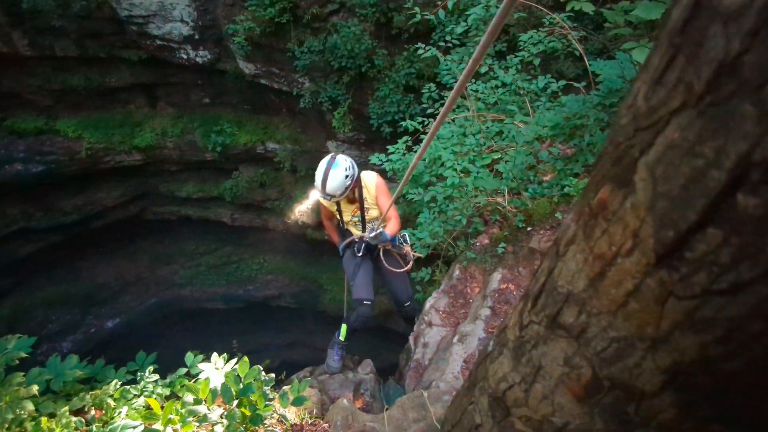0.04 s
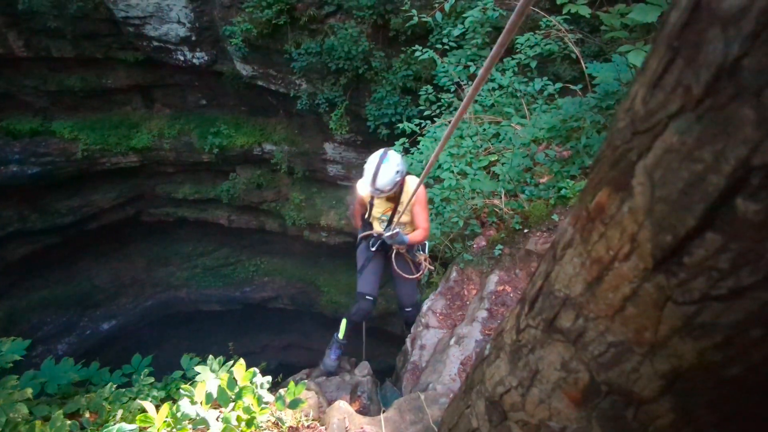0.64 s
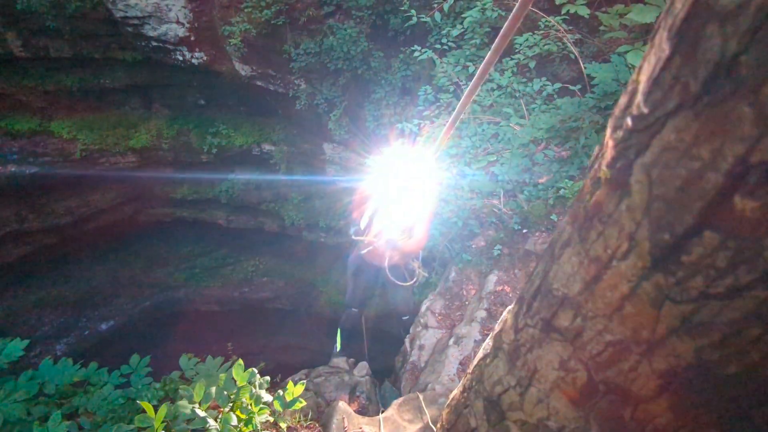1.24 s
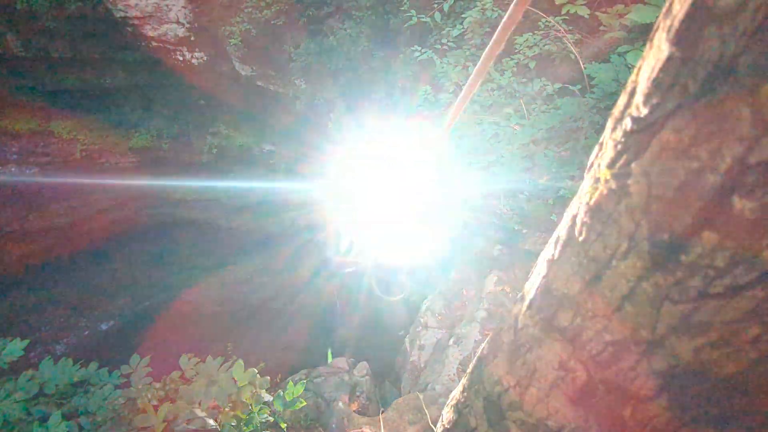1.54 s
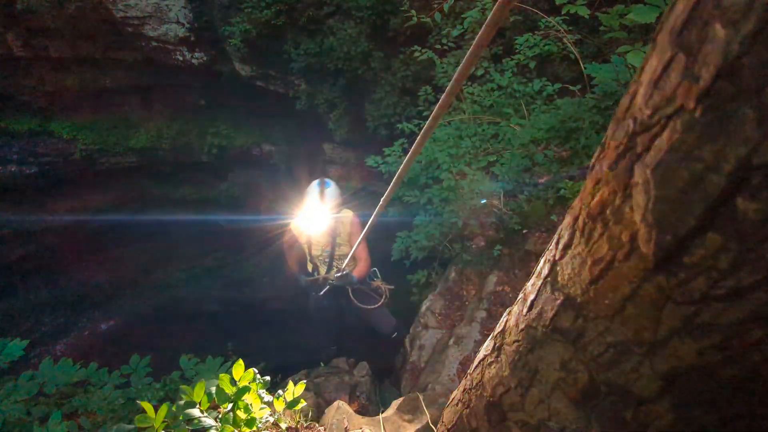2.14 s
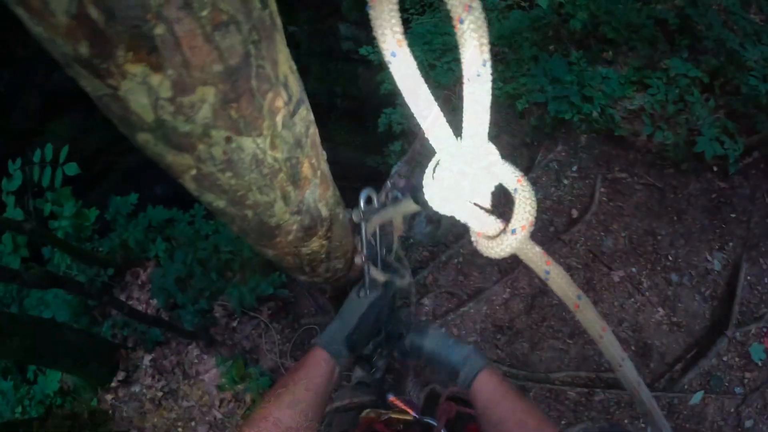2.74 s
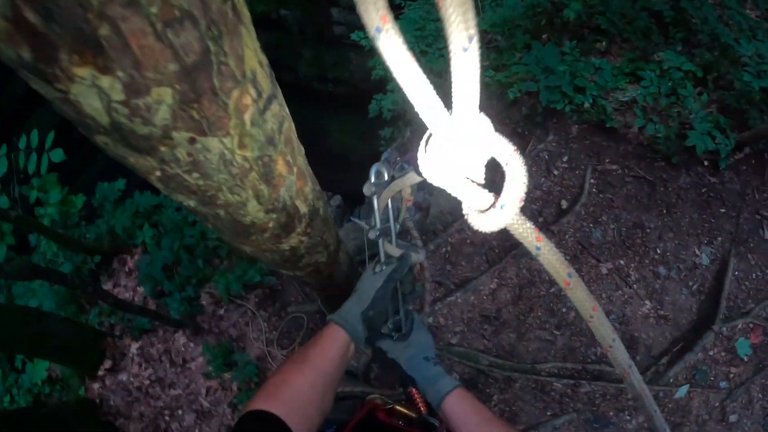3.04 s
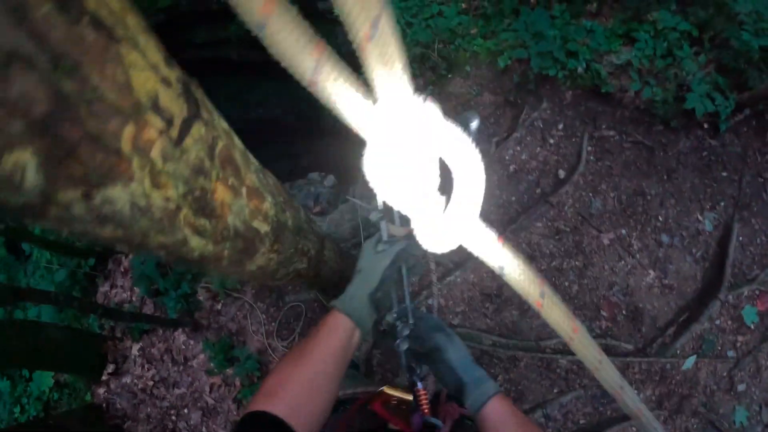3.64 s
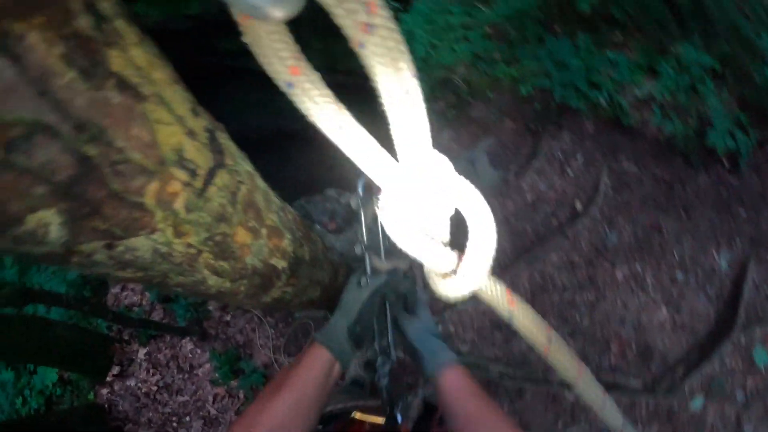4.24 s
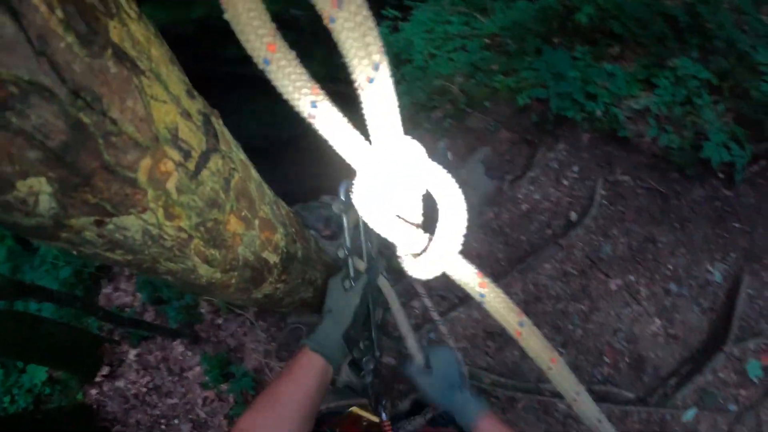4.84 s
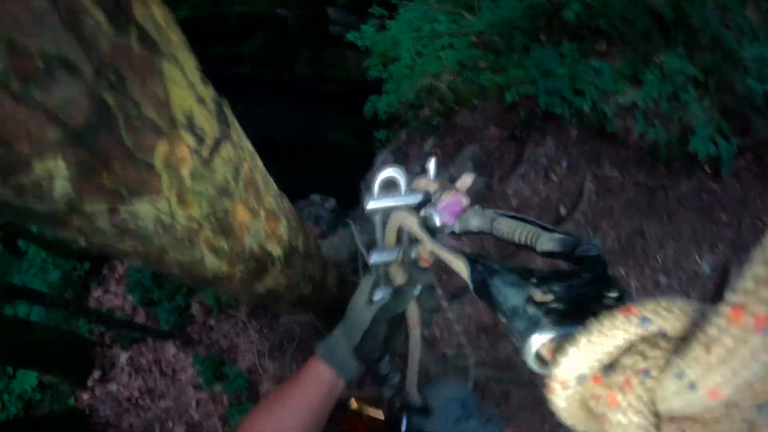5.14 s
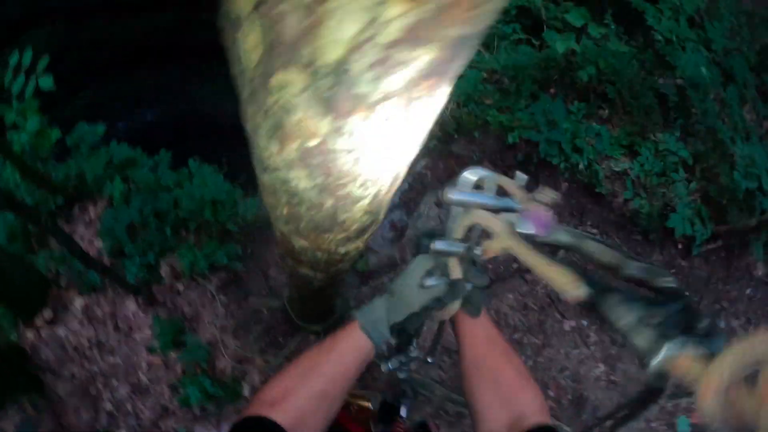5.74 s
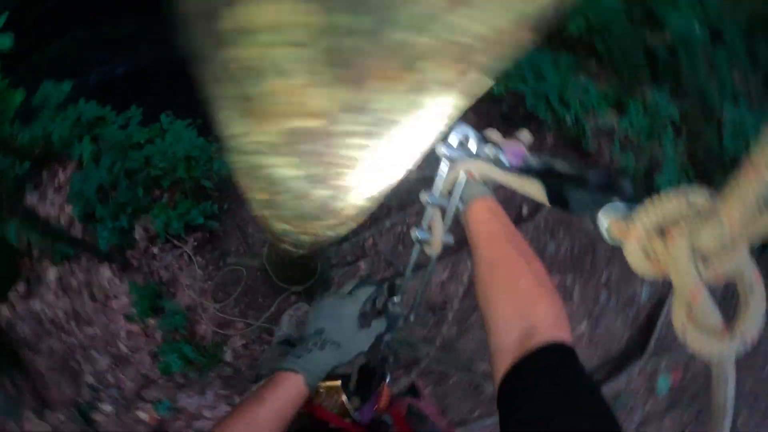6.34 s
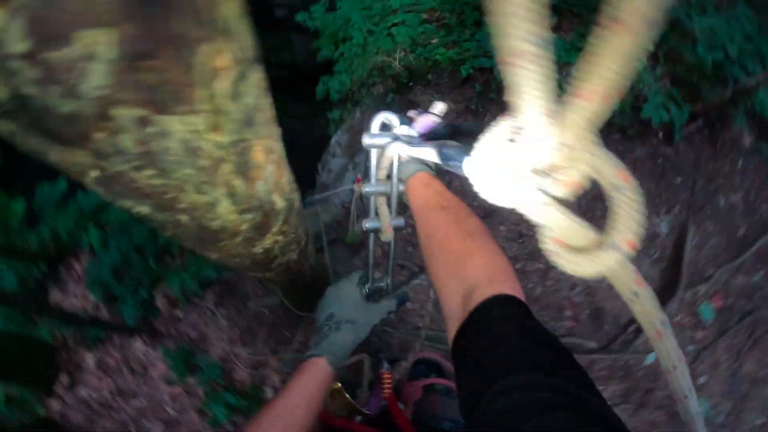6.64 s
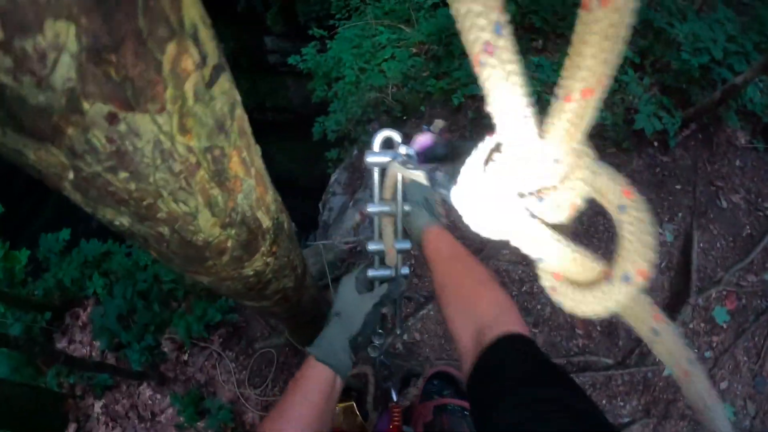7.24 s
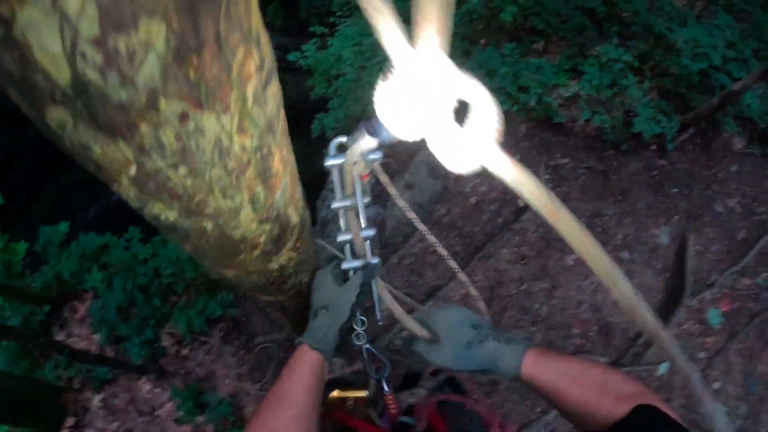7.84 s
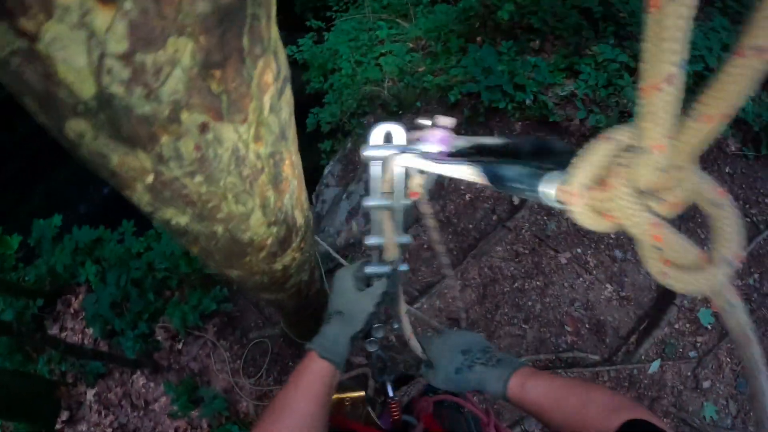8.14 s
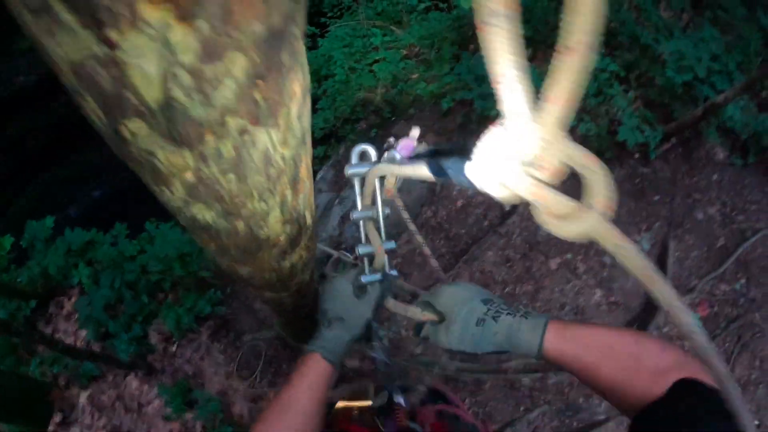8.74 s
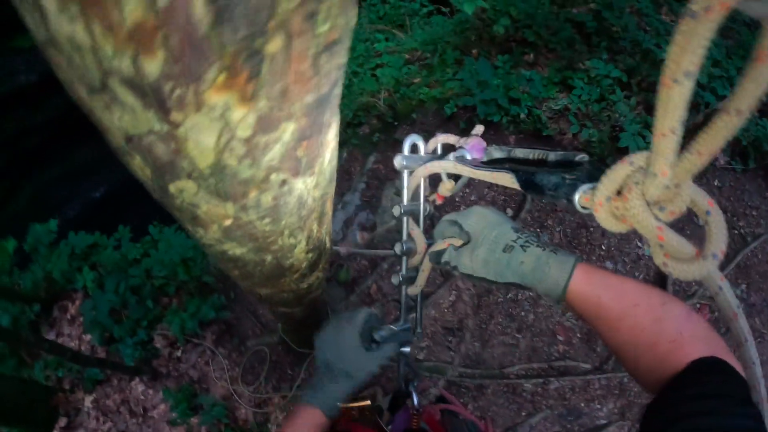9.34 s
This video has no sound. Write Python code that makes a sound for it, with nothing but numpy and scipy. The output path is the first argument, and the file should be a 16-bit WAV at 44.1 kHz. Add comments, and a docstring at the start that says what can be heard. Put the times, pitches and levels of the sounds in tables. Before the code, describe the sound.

For the first 2.5 seconds a soft, wide forest hiss with a fluttering trill comes from afar, with a few faint knocks and rope scuffs. By 3 seconds the sound turns close and narrow: an even outdoor hiss, low microphone rumble, a faint hollow hum that comes and goes, and gloves rubbing rope in tiny scratchy slips. A steel rappel rack and carabiners click near 2.9, 4 and 4.8 seconds, mixed with dull gear knocks. From about 5.1 to 5.3 seconds the rope bumps the microphone housing in a quick cluster of low booms, the loudest moment. Sharp, briefly ringing steel clacks follow at 5.7, 6.6 and 7 seconds, then a dull knock at 7.9 and a bright rattling cluster around 8.8 seconds with a lurch of rumble. From about 7.5 seconds a high, throbbing insect hiss swells until the end at 9.5 seconds.

```python
"""A steel rappel rack clicks and rings as a caver threads a rope through it at the wooded edge of a pit.
Its bars and carabiners strike each other, gloves rub the rope in tiny slips, gear knocks dully,
and the rope bumps the microphone housing, which booms. At first the forest hisses from afar; then the
sound moves close, with a low rumble and a faint hollow hum. Insects swell towards the end."""
import sys
import numpy as np
from scipy import signal
from scipy.fft import rfft, irfft, next_fast_len
from scipy.io import wavfile

SR = 44100
rng = np.random.default_rng(int(sys.argv[2]) if len(sys.argv) > 2 else 0)


def store_wav(level_fs):
    """Save 16-bit WAV to argv[1]."""
    pcm = np.round(np.clip(np.atleast_2d(level_fs), -1, 1) * 32767)
    wavfile.write(sys.argv[1], SR, pcm.T.astype(np.int16))


N = 418509
TIME = np.arange(N) / SR


def rack_clicks(rise_s=0.00022, chatter_db=-24, chatter_t60_s=0.09, lead_in_db=-19, lead_in_s=0.0083):
    """Steel hits steel: a burst of tiny contacts shakes the hand-held rack, then free parts ring on."""
    # resonances of the rack, damped by the hand: pitch_hz, width_hz, level_db
    rack_modes = [(480, 170, -11.5), (1377, 79, 1), (1710, 980, -11.5), (2400, 560, 2), (3170, 270, 4.5),
                  (3680, 470, 5.5), (4930, 710, -2.5), (5620, 600, 0), (6930, 380, -4.5), (8430, 370, -9),
                  (9440, 1060, -15), (11860, 900, -34)]
    # free ringing of each steel part: pitch_hz, level_db, t60_s (time to fade by 60 dB)
    frame_modes = [(2780, -36, 0.078), (3360, -49, 0.09), (3330, -30, 0.15), (3950, -55, 0.14),
                   (4070, -76.5, 0.049)]
    bar_modes = [(6980, 0, 0.097), (7050, -10.5, 0.1)]
    carabiner_modes = [(8640, -0.5, 0.082), (8670, -18, .07), (15460, -41, 0.079)]
    lead = SR // 50   # a faint noise swells just before the hit
    out, t = np.zeros(N), (np.arange(SR // 4) - lead) / SR
    after = np.maximum(t, 0)
    for start_s, level_db, pitch_hz, knock_db, edge_db, bar_db, carabiner_db, t60_s in steel_contacts():
        onset = 1 - np.exp(-after / rise_s)
        chatter = from_db(chatter_db - 60 * after / chatter_t60_s)
        blow = onset * (from_db(-60 * after / t60_s) + chatter)
        lead_in = from_db(lead_in_db) * np.exp(-abs(t) / lead_in_s)
        force = rng.standard_normal(len(t)) * (blow + lead_in)
        clack = sum((-1) ** k * from_db(db) * resonate(force, hz * rng.normal(1, 0.075), width_hz)
                    for k, (hz, width_hz, db) in enumerate(rack_modes))
        # a heavy blow adds a low knock, a sharp one a bright edge
        clack += from_db(knock_db + 8) * resonate(force, 1390, 1200)
        clack += from_db(edge_db + 5) * cut(cut(force, 7400, "high"), 12500, "low", order=4)
        clack *= from_db(-10) / np.std(clack[lead:lead + SR // 250])   # level set by the first 4 ms
        # the spot struck favours one pitch: a quick clink, then a faint ping; hard blows are less pure
        clink = ring([(pitch_hz, -3, 0.016), (pitch_hz, -24, 0.11)], after)
        purity = from_db(-.9 * max(level_db + 20, 0))
        clack += purity * onset * clink
        clack += ring(frame_modes, after, spread_db=10)
        loose = from_db(bar_db - 1) * ring(bar_modes, after, spread_db=0.5)
        loose += from_db(carabiner_db - 2) * ring(carabiner_modes, after)
        # loose parts keep touching, so their ringing is uneven
        loose *= from_db(np.interp(after, np.linspace(0, .25, 40), rng.normal(0, 2, 40)))
        add(out, start_s - lead / SR, from_db(level_db) * clack + loose)
    return out


def steel_contacts(hard_above_db=-21, touches=3, gap_s=.014, first_db=-14.5, loss_db=4):
    """List every hit of steel on steel; a hard one rattles on in uneven, weaker touches."""
    # metal hits; knock and edge are relative to the clack, bar and carabiner ring at their own levels:
    # start_s, level_db, pitch_hz, knock_db, edge_db, bar_db, carabiner_db, t60_s
    hits = [(2.9447, -23.5, 3760, -16, -38, -52, -65, .012),
            (3.9723, -19.5, 3140, -8, -15, -33, -60, 0.014), (3.9824, -21, 2930, -19, -28, -52, -58, .014),
            (4.023, -27.5, 2950, -10, -34, -46, -62, 0.024), (4.11, -33, 3770, -25, -27, -45, -65, .022),
            (4.189, -32.5, 3050, -27, -37, -53, -67, .016), (4.8006, -24.5, 3330, -12, -39, -41, -59, .03),
            (5.09, -19, 3850, -22, -12, -28, -35, .025), (5.135, -25, 2630, 7, -40, -42, -48, 0.093),
            (5.3056, -25.5, 5700, -8, -16, -46, -44, .014), (5.4772, -31.5, 3660, 1, -23, -47, -62, .01),
            (5.541, -34.5, 7000, -4, -38, -49, -72, 0.022), (5.7142, -13, 3980, -8.5, -32, -37, -62, 0.048),
            (5.725, -16.5, 3920, -15, -22, -29, -58, .03), (5.794, -27.5, 2600, -3, -30, -54, -70, 0.034),
            (5.9898, -32, 4250, -20, -35, -43, -67, .011), (6.619, -21, 3730, -27, -23, -45, -63, 0.014),
            (6.819, -32, 3480, -3, -45, -46, -69, .035), (7.016, -13.5, 3680, -12, -16.5, -48, -56, .018),
            (7.0196, -17, 3310, -35, -13.5, -38, -50, 0.022), (7.2227, -32.5, 2400, 2, -13, -48, -65, .014),
            (7.9094, -28, 3270, -16, -26, -41, -47, .021), (8.345, -38, 6920, -32, -33, -42, -61, .016),
            (8.4753, -30, 5800, -30, -15, -44, -40, 0.011), (8.7623, -11.5, 3540, -14, -22, -46, -40, .025),
            (8.7715, -15.5, 3540, -26, -25, -31, -42, .015),
            (8.7806, -14, 3710, -25, -9.5, -37, -16.5, .014),
            (8.8657, -27.5, 3500, -15, -33, -42, -57, 0.039),
            (8.926, -16.5, 3580, -30, -20, -35, -23, 0.013), (8.963, -31, 7000, -23, -32, -36, -43, .016)]
    rows = list(hits)
    for start_s, db, hz, knock_db, edge_db, bar_db, carabiner_db, t60_s in hits:
        if db > hard_above_db:
            delays_s = np.cumsum(gap_s * rng.uniform(.7, 1.3, touches))
            for k, delay_s in enumerate(delays_s):
                drop = first_db - loss_db * k
                rows.append((start_s + delay_s, db + drop, hz, knock_db, edge_db,
                             bar_db + drop, carabiner_db + drop, t60_s))
    return rows


def gear_knocks(t60_s=0.043, scuff_gain=0.08):
    """Gear knocks dully on rope and rock: one push and a short scuff into a broad resonance."""
    # padded blows: start_s, peak_db, pitch_hz
    blows = [(.764, -36, 2700), (1.361, -29.5, 1130), (1.6692, -26, 3330), (2.946, -30.5, 1900),
             (3.368, -31, 600), (4.802, -26.5, 940), (4.897, -32.5, 1460), (4.947, -32, 1560),
             (5.037, -32.5, 1500), (5.1823, -26, 700), (5.421, -31.5, 890), (5.716, -27, 554),
             (5.725, -27, 161), (5.902, -25, 602), (6.444, -33.5, 199), (6.899, -33, 1300),
             (7.2233, -31, 1590), (7.901, -24, 1120), (7.9065, -19.5, 1280), (7.91, -29, 450),
             (8.764, -23.5, 600)]
    out, t = np.zeros(N), TIME[:SR // 8]
    push = t == 0
    for start_s, peak_db, hz in blows:
        scuff = scuff_gain * np.sqrt(hz / 1000) * rng.standard_normal(len(t)) * from_db(-60 * t / t60_s)
        knock = cut(resonate(push + scuff, hz, 1.3 * hz), 2.2 * hz, "low")
        add(out, start_s, from_db(peak_db) * knock / np.abs(knock).max())
    return out


def rope_bumps(scuff_db=-27, scuff_hz=620, scuff_t60_s=0.11, rebound_s=.011, rebound_db=-4.5):
    """The rope pushes the microphone housing so it booms, scuffs along it and bounces once."""
    # soft pushes of the rope: start_s, level_db, contact_s
    pushes = [(5.139, -2.5, 0.0031), (5.184, -10.5, 0.0045), (5.196, -8.5, 0.0039), (5.219, -17, 0.0031),
              (5.269, -16, 0.0046), (5.297, -18, 0.0058)]
    # resonances of the housing: pitch_hz, level_db, t60_s
    housing_modes = [(80.2, -4.5, 0.1), (170.2, -2, 0.061), (246, 2, 0.029), (390.4, -7.5, 0.13),
                     (546, -12, 0.047)]
    out, t = np.zeros(N), TIME[:SR // 4]
    housing = ring(housing_modes, t)
    for start_s, level_db, contact_s in pushes:
        push = np.sin(np.linspace(0, np.pi, int(contact_s * SR)))
        boom = np.convolve(housing, push / push.sum())[:len(t)]
        scuff = cut(resonate(rng.standard_normal(len(t)), scuff_hz, 394), 760, "low", order=4)
        scuff = rms_one(scuff) * from_db(scuff_db - 60 * t / scuff_t60_s)
        bump = from_db(level_db) * (boom + scuff)
        add(out, start_s, bump)
        add(out, start_s + rebound_s, from_db(rebound_db) * bump)
    return cut(out, 70, "high")


def glove_rustle(rub_db=-3, scratch_db=-6, crackle_db=-11, patchy_db=2):
    """Gloves drag on the rope in uneven slips: a low rub, a higher scratch and a faint crackle."""
    # strokes of a glove along the rope: start_s, length_s, rub_level_db, scratch_level_db
    strokes = [(.1, 0.11, -67, -61), (.99, 0.085, -56.5, -55), (1.08, 0.29, -69.5, -54),
               (1.29, .18, -54.5, -49.5), (1.53, 0.25, -63, -54.5), (2.5, 0.56, -59.5, -54),
               (3.06, .12, -56, -55), (3.33, .14, -47.5, -47.5), (3.62, 0.48, -56.5, -56),
               (4.46, 0.67, -56.5, -55.5), (5.05, 0.32, -43, -44.5), (5.68, 0.15, -46, -44),
               (5.83, 0.17, -56, -48.5), (5.97, .15, -45.5, -54), (6.39, 0.3, -51, -51.5),
               (6.74, 0.37, -50, -51), (7.26, .2, -54.5, -52), (7.47, 0.37, -59, -59),
               (7.87, 0.15, -58, -45.5), (8.07, 0.14, -61, -54.5), (8.5, 0.2, -74, -53),
               (8.74, 0.18, -56, -48.5), (8.91, 0.16, -71, -54), (9.34, 0.16, -57, -65)]
    # tone of the rubbing and of the scratching: pitch_hz, level_db
    rub_spectrum = [(53, -43), (90, -12.5), (129, -7.5), (156, -4.5), (216, -4), (297, -1.5), (355, -4),
                    (488, -9), (700, -11.5), (910, -63), (1540, -120)]
    scratch_spectrum = [(300, -14), (500, -13), (900, 6.5), (1500, -0.5), (3000, 3), (6000, -31.5)]
    grip = nearness() * from_db([[-65.5], [-61]])   # rub and scratch of the grip shifting between strokes
    rub_gain, scratch_gain = np.hypot(swells(strokes), grip)
    rub = rub_gain * colour(slips(2500, 4.7) * from_db(patchy_db * drift(35)), rub_spectrum)
    scratch = scratch_gain * colour(slips(3000, 4.5) * from_db(patchy_db * drift(45)), scratch_spectrum)
    crackle = scratch_gain * rms_one(cut(resonate(slips(430, 4.8), 4100, 3200), 7000, "low"))
    return from_db(rub_db) * rub + from_db(scratch_db) * scratch + from_db(crackle_db) * crackle


def rope_drags(slips_per_s=1200, patchy_db=3):
    """The rope's woven cover catches and slips in a swell of tiny jerks."""
    # short drags of rope and cloth: start_s, length_s, level_db, pitch_hz
    drags = [(1.06, 0.071, -51.5, 1610), (1.376, 0.14, -49, 1500), (1.627, 0.13, -51.5, 2640),
             (3.348, 0.056, -58, 1000), (3.76, 0.27, -56.5, 187), (4.477, .08, -58.5, 706),
             (4.805, 0.079, -50, 418), (5.038, 0.088, -43, 990), (5.936, 0.058, -46, 2090),
             (5.963, 0.024, -42, 450), (6.411, 0.07, -46, 810), (6.768, 0.05, -64, 900),
             (7.31, 0.078, -56, 246), (8.092, 0.083, -63, 700), (8.837, 0.029, -50, 900),
             (8.754, 0.057, -49, 169)]
    out = np.zeros(N)
    jerks = slips(slips_per_s, 3.5) * from_db(patchy_db * drift(90))
    for start_s, length_s, level_db, hz in drags:
        drag = jerks[int(start_s * SR):][:int(length_s * SR)]
        drag = cut(resonate(drag, hz, 0.35 * hz), 2 * hz, "low")
        arch = np.sin(np.linspace(0, np.pi, len(drag)))
        add(out, start_s, from_db(level_db) * rms_one(drag) * arch)
    return out


def sway_rumble(sway_db=-57, waver_db=2.5):
    """The microphone rumbles as it sways gently and lurches with the caver's body."""
    # lurches of the body: start_s, length_s, level_db
    lurches = [(5.05, 0.44, -48), (5.68, 0.39, -50), (6.4, 0.21, -54), (7.55, 0.7, -52.5), (8.7, 0.41, -43)]
    # tone of the rumble: pitch_hz, level_db
    spectrum = [(15, 12.5), (30, 8), (50, 1.5), (80, -10.5), (140, -44)]
    motion = np.hypot(from_db(sway_db) * nearness(), swells(lurches)[0])
    waver = from_db(waver_db * drift(9.9))
    return waver * motion * cut(colour(rng.standard_normal(N), spectrum), 160, "low")


def hollow_hum(pitch_hz=290.5, width_hz=75, waver_db=3.5):
    """Air in one narrow resonance makes a faint, wavering hum that comes and goes."""
    # spells of humming: start_s, length_s, level_db
    spells = [(2.35, 0.83, -57.5), (3.6, 0.26, -62), (4.1, .24, -58.5), (4.5, 0.65, -59), (6.42, 0.26, -56),
              (6.67, 0.24, -50), (7.27, 0.22, -63), (9.36, 0.15, -67)]
    air = resonate(resonate(rng.standard_normal(N), pitch_hz, width_hz), pitch_hz, width_hz)
    return swells(spells)[0] * rms_one(air * from_db(waver_db * drift(16)))


def insect_chorus(throb_db=3):
    """Many insects blend into one high, throbbing hiss that swells towards the end."""
    # loudness of the chorus: time_s, level_db
    levels = [(0, -110), (6.8, -66), (7.6, -54), (8.2, -51), (8.7, -47.5), (9.49, -46.5)]
    # tone of the chorus: pitch_hz, level_db
    spectrum = [(2500, -18), (4000, -3), (5200, -1), (7300, 1), (8200, -9), (9500, -8), (10500, -16),
                (12200, -20), (14000, -36), (15500, -48)]
    return gain_curve(levels) * colour(rng.standard_normal(N), spectrum) * from_db(throb_db * drift(30))


def near_forest(waver_db=1.23):
    """The forest hisses evenly at the edge of the pit."""
    # loudness of the hiss: time_s, level_db
    levels = [(0, -110), (2.2, -70), (2.5, -54), (2.9, -49), (4.2, -49.5), (4.4, -50.5), (5.1, -49.5),
              (5.25, -53), (5.65, -52), (6, -48), (6.3, -51), (7.1, -50), (7.5, -52), (9.49, -51)]
    # tone of the hiss: pitch_hz, level_db
    spectrum = [(290, -42), (500, -15), (578, -21.5), (729, -7), (906, -12.5), (1260, -1.5), (1690, -1.5),
                (3440, 1.5), (6900, -2), (7640, -9.5), (8210, -9.5), (11100, -18), (12500, -17.5),
                (14900, -28), (16000, -72)]
    return gain_curve(levels) * colour(rng.standard_normal(N), spectrum) * from_db(waver_db * drift(18))


def far_forest(trill_db=-8, trill_hz=2700, flutter_hz=32, flutter_depth=0.46):
    """A wide forest hiss comes from across the pit, with a fluttering trill; in stereo."""
    # loudness of the far forest: time_s, level_db
    levels = [(0, -47), (1, -47.5), (1.6, -46), (2.2, -48.5), (2.6, -52), (3, -86.5), (9.49, -110)]
    # tone of the hiss on each side: pitch_hz, level_db
    left = [(35, -29.5), (80, -9), (300, -21.5), (520, -14.5), (1200, -9.5), (1900, 1.5), (2250, -2),
            (2750, 1), (3550, -7), (5400, -5.5), (6500, -2.5), (8000, -11), (10000, -0.5), (11300, -11.5),
            (15800, -14.5)]
    right = [(35, -31.5), (80, -14), (300, -12), (520, -16.5), (1200, -6.5), (2000, -1.5), (2750, -1.5),
             (3250, -8.5), (3800, -0.5), (5300, -7.5), (6500, -3), (8000, -9), (8800, 1.5), (11800, -12.5),
             (15800, -17)]
    hiss = np.array([colour(rng.standard_normal(N), side) for side in (left, right)])
    # low sounds reach both ears nearly alike
    bass = cut(hiss, 430, "low", order=1)
    hiss = hiss - bass + bass.sum(axis=0) / np.sqrt(2)
    flutter = 1 + flutter_depth * np.sin(2 * np.pi * flutter_hz * TIME + 1.7 * drift(5.26))
    band = resonate(rng.standard_normal((2, N)), trill_hz, 490)
    trill = rms_one(band * flutter * from_db(2 * drift(6.44)))
    return gain_curve(levels) * (hiss * from_db([[-.5], [.5]]) + from_db(trill_db) * trill)


def from_db(db):
    """Turn decibels into a gain."""
    return 10 ** (np.asarray(db) / 20)


def rms_one(x):
    """Scale a sound to an average level (rms) of 1."""
    return x / np.sqrt(np.mean(x ** 2) + 1e-20)


def gain_curve(rows):
    """Join (time_s, level_db) points into a gain for every sample."""
    times_s, levels_db = np.transpose(rows)
    return from_db(np.interp(TIME, times_s, levels_db))


def swells(rows, attack_share=0.22, release_share=0.38):
    """A gain curve for each dB column: every movement builds up, holds and lets go."""
    out = np.zeros((len(rows[0]) - 2, N))
    for start_s, length_s, *levels in rows:
        progress = np.linspace(0, 1, int(length_s * SR))
        shape = np.minimum(1, np.minimum(progress / attack_share, (1 - progress) / release_share))
        for curve, db in zip(out, levels):
            add(curve, start_s, from_db(db) * shape)
    return out


def nearness(start_s=2.2, end_s=3):
    """Rises from 0 to 1 as the sound moves from far to close."""
    return np.interp(TIME, [start_s, end_s], [0, 1])


def add(out, start_s, sound):
    """Mix a sound in at its start time."""
    i = int(start_s * SR)
    out[i:i + len(sound)] += sound[:N - i]


def cut(x, hz, kind, order=2):
    """Keep the "low" or the "high" side of a frequency."""
    return signal.sosfilt(signal.butter(order, min(hz, .45 * SR), kind, fs=SR, output="sos"), x)


def resonate(x, hz, width_hz):
    """A resonance: it lets through a band around one pitch."""
    r = np.exp(-np.pi * width_hz / SR)
    feedback = [1, -2 * r * np.cos(2 * np.pi * hz / SR), r * r]
    return signal.lfilter(np.array([1, 0, -1]) * (1 - r * r) / 2, feedback, x)


def ring(modes, t, spread_db=0):
    """Fading pure tones; spread_db varies how hard each is struck."""
    return sum(from_db(db + spread_db * rng.normal() - 60 * t / t60_s) * np.sin(2 * np.pi * hz * t)
               for hz, db, t60_s in modes)


def drift(per_s):
    """A curve that glides to a new random value per_s times a second."""
    return np.interp(TIME * per_s, np.arange(4000), rng.standard_normal(4000))


def colour(x, spectrum):
    """Shape a sound's tone with (pitch_hz, level_db) points; its rms comes out as 1."""
    size = next_fast_len(N)
    pitches_hz, levels_db = np.transpose(spectrum)
    hz = np.fft.rfftfreq(size, 1 / SR)
    gain = from_db(np.interp(np.log(hz + 1), np.log(pitches_hz), levels_db))
    return rms_one(irfft(rfft(x, size) * gain, size)[..., :N])


def slips(per_s, spread_db):
    """Fibres slip at random moments, making ticks of uneven size."""
    ticks = (rng.random(N) < per_s / SR) * rng.choice([-1, 1], N)
    return ticks * from_db(spread_db * np.minimum(rng.exponential(1, N), 4))


def scene(treble_hz=12000, scatter_t60_s=0.0041, insect_pan_db=1.5, insect_width_db=-8):
    """Close sounds sit near the middle; the far forest, insects and highest treble are wider."""
    # stereo width of the close sounds as the head turns: time_s, side_db
    widths = [(0, -7), (3, -60), (4.8, -46.5), (5.15, -14.5), (5.6, -50), (6.9, -30), (7.6, -17),
              (8.5, -13.5), (9.49, -11)]
    rumble, hiss, insects = sway_rumble(), near_forest(), insect_chorus()
    close = rack_clicks() + gear_knocks() + rope_bumps() + glove_rustle() + rope_drags()
    close += hollow_hum() + rumble + hiss
    # sound from the side reaches the two microphone openings out of step
    side = gain_curve(widths) * signal.hilbert(close, next_fast_len(N)).imag[:N]
    # the chorus and the highest treble arrive scattered
    t = TIME[:SR // 50]
    scatter = rng.standard_normal(len(t)) * from_db(-60 * t / scatter_t60_s)
    wide = from_db(insect_width_db) * insects + cut(close + insects, treble_hz, "high", order=8)
    side += signal.fftconvolve(wide, scatter / np.linalg.norm(scatter))[:N]
    panned_insects = insects * from_db([[insect_pan_db], [-insect_pan_db]])
    return far_forest() + close + panned_insects + side * [[1], [-1]]


def record(dry):
    """A steep filter takes off the very top of the treble."""
    cutoff_hz = 15800
    return signal.sosfilt(signal.ellip(10, .2, 80, cutoff_hz, fs=SR, output="sos"), dry)


dry = scene()
out = record(dry)
store_wav(out)
```